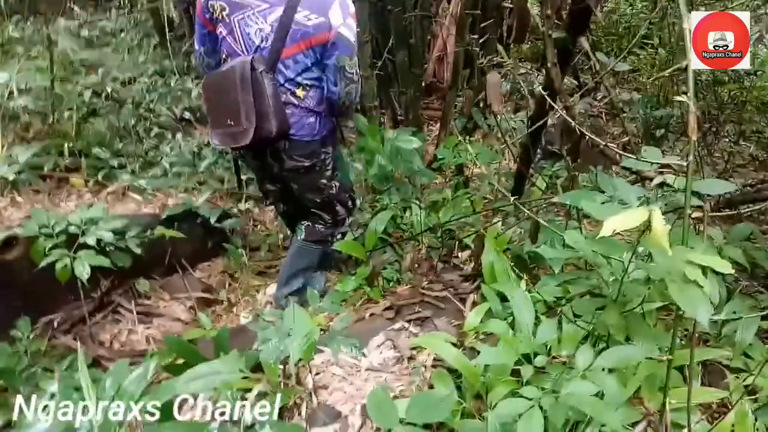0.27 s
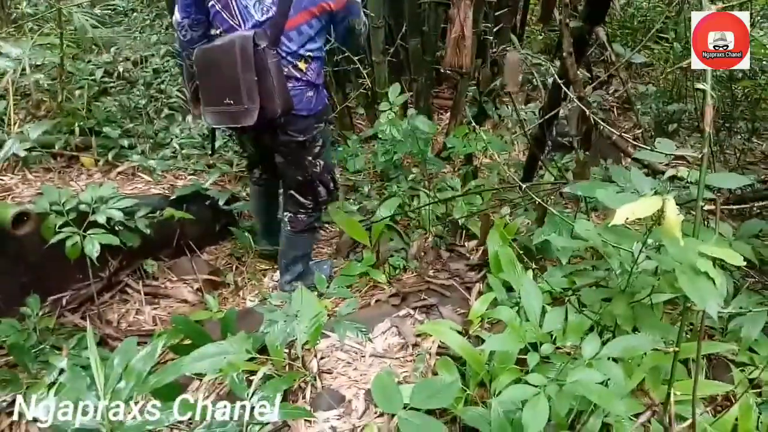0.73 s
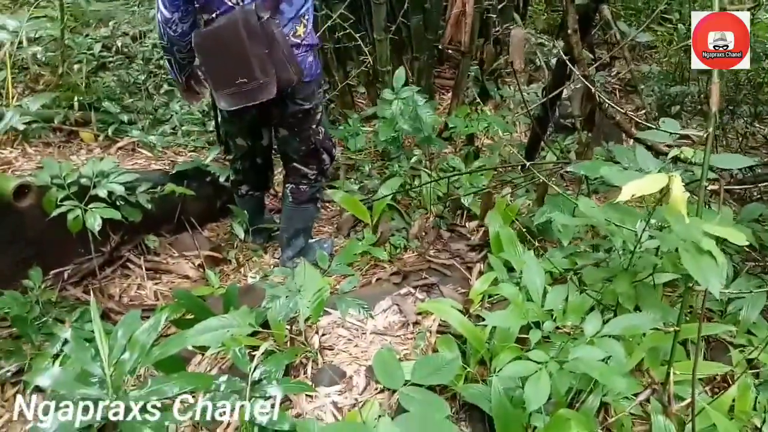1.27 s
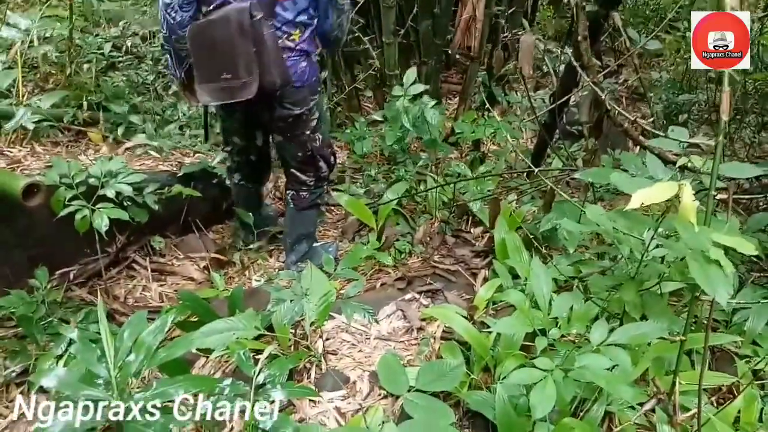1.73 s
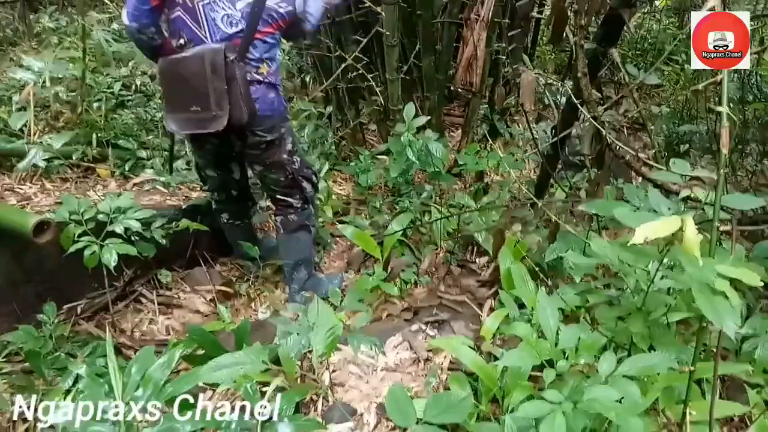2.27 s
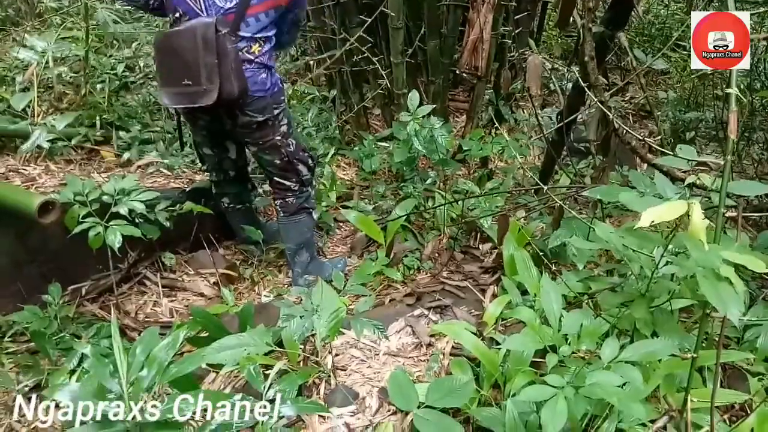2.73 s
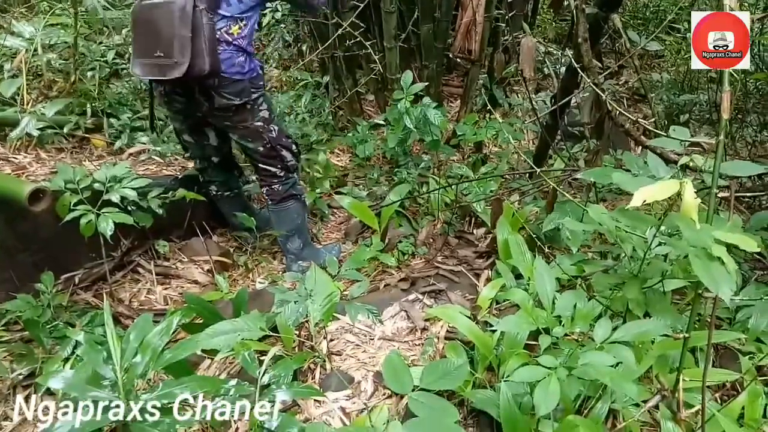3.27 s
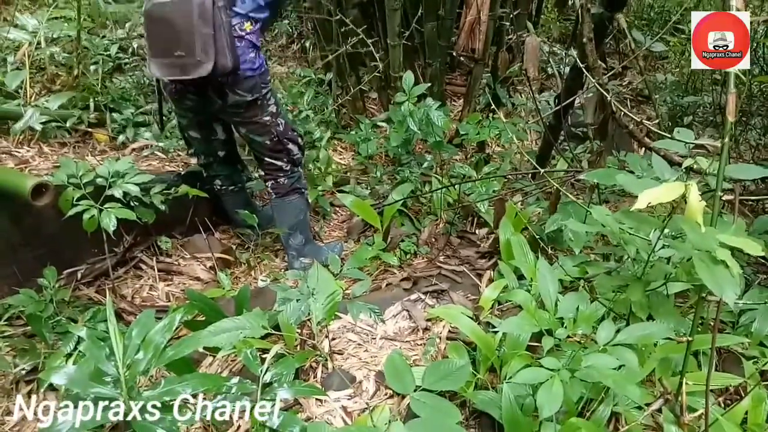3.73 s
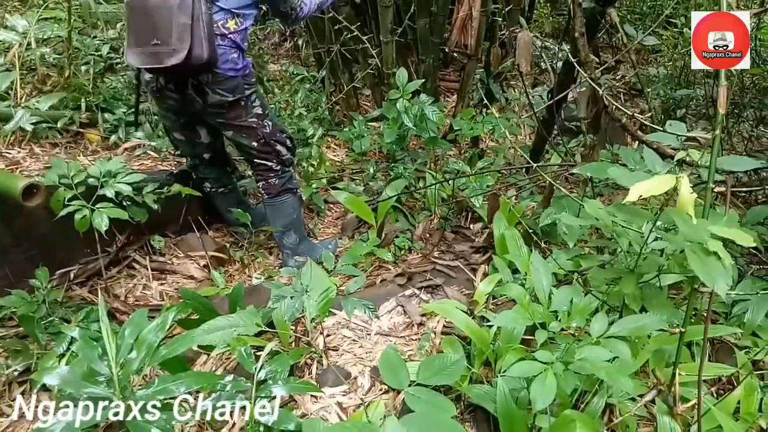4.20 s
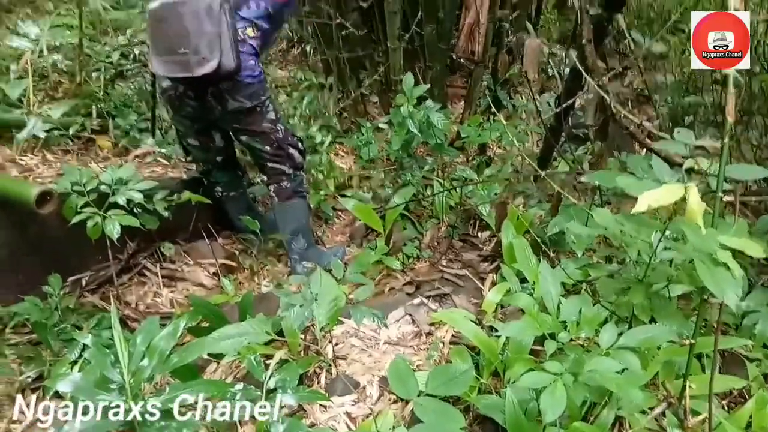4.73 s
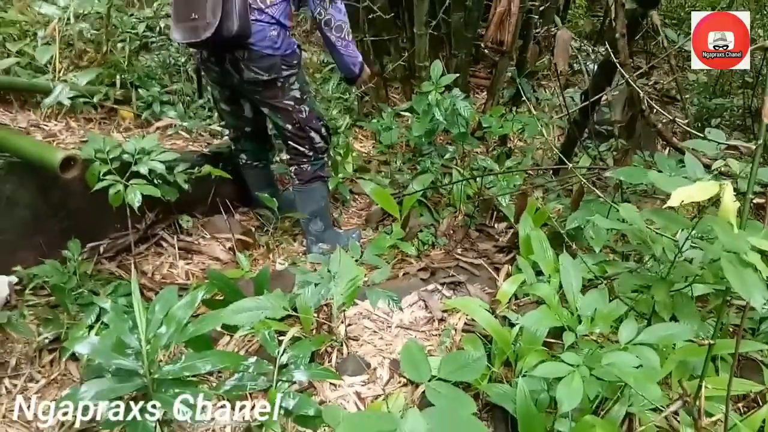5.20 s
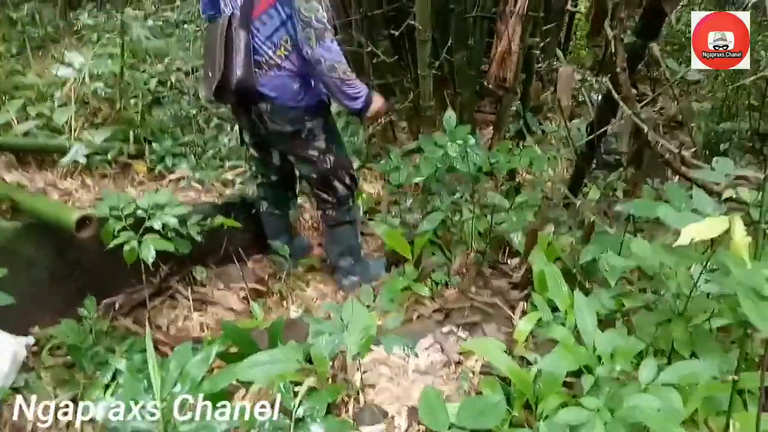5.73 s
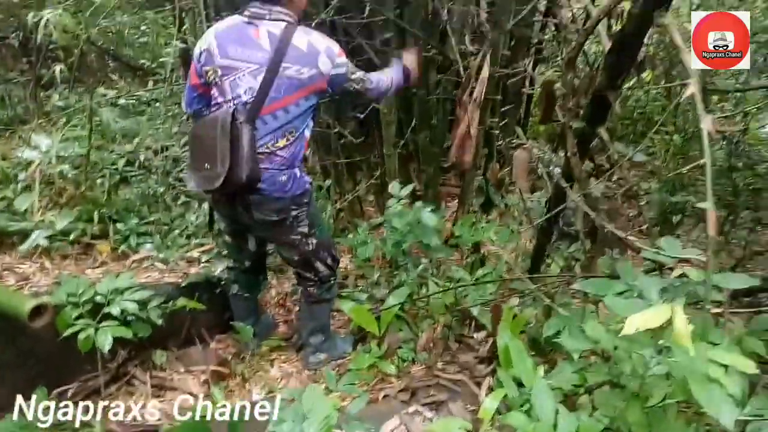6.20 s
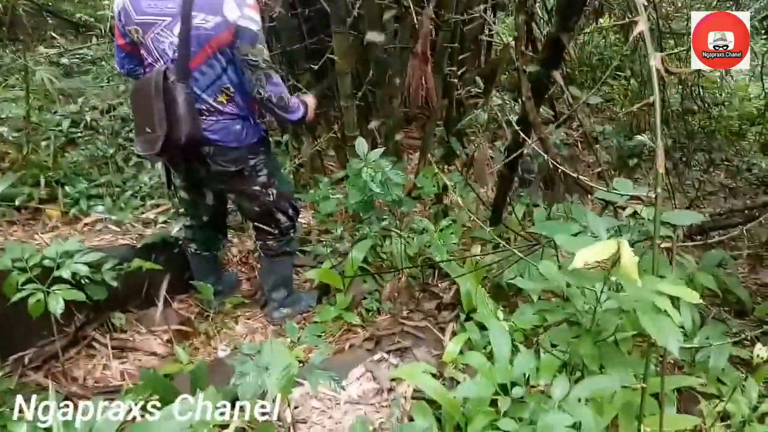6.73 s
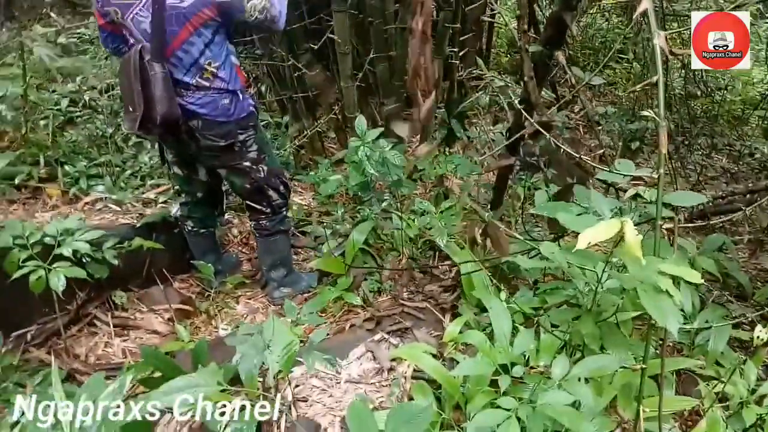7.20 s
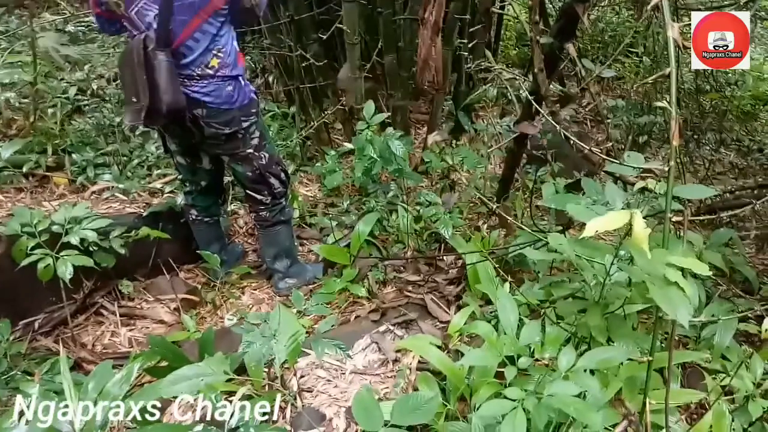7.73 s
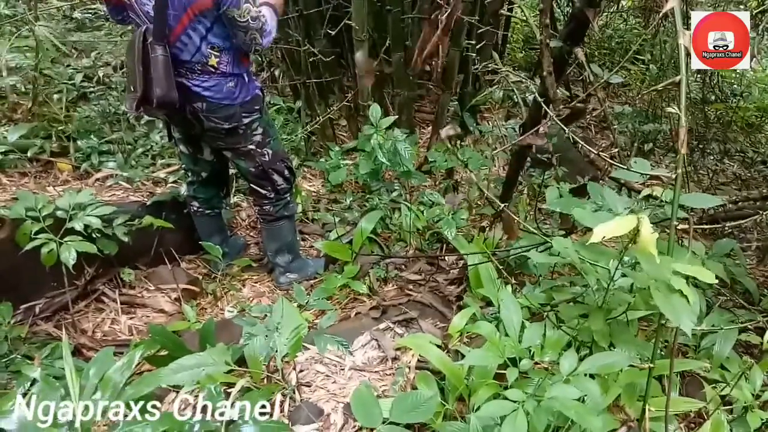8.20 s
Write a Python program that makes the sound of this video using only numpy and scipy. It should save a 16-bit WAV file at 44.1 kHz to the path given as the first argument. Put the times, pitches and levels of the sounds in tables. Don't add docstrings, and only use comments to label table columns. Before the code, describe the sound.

A quiet forest opens with thin steady crickets around 3.5 kHz, a far insect chorus and soft low rumble; a faint thump comes near 0.1 s, a tiny rising two-note bird whistle at 0.8 s and a small twig tick at 0.9 s. At 1.3 s a blade hits dry cane: a sharp crack, tearing fibres, hollow knocks and rustling leaves until about 1.8 s. Further blows land at 2.4, 3.5 and 4.4 s, the third strong and splintery, with twigs snapping between. From 4.7 to 6 s only light rustle and small ticks remain. At 6.2 s a dense rapid burst of cracks lasts about 0.15 s, then leaves shake and twigs tick. A last heavy, woody crack at 7.6-7.7 s has a brief stem creak and strong rustling, fading into small snaps by 8.4 s. Short diffuse tree echoes follow the blows; close-to-middle distance, wide stereo.

```python
import sys
import numpy as np
from scipy import signal
from scipy.fft import rfft, irfft, next_fast_len
from scipy.io import wavfile
from scipy.ndimage import uniform_filter1d

SR = 44100
rng = np.random.default_rng(int(sys.argv[2]) if len(sys.argv) > 2 else 0)


def ratio_of_db(decibels):
    return 10 ** (np.asarray(decibels, float) / 20)


def file_out(sig):
    cols = np.atleast_2d(sig).T
    lim = np.clip(cols, -1, 1)
    pcm = np.round(lim * 32767).astype(np.int16)
    wavfile.write(sys.argv[1], SR, pcm)


N = 373086
SIZE = next_fast_len(N + 4096, True)
HZ = np.maximum(np.arange(SIZE // 2 + 1) * SR / SIZE, 1.)
T = np.arange(N) / SR

# pitch_hz, level_db (per Hz)
FOREST_COLOUR = [(18, -42), (40, -17.5), (62, -2.5), (110, 1.5), (364, -20), (1700, -24), (3050, -29.5),
                 (3250, -10.5), (3750, -7), (4700, -20), (6900, -25), (7470, -55.5), (12300, -43),
                 (14400, -31), (15100, -50)]
# pitch_hz, likeness_0_to_1
FAR_LIKENESS = [(60, 0.8), (130, 0.8), (300, 0.9), (700, 0), (1500, 0.5), (3000, 0)]
# pitch_hz, width_hz, level_db
CRICKETS = [(3260, 35, -4), (3330, 25, -5.5), (3484, 25, -3.5), (3525, 35, -3), (3630, 22, -7.5)]
# time_s, level_db
CRICKET_SWELL = [(0.0, -51.5), (0.38, -55.5), (1.34, -56), (1.43, -55), (2.09, -56.5), (3.72, -54),
                 (4.29, -57.5), (4.59, -53.5), (6.03, -56.5), (6.41, -52), (6.76, -54.5), (8.46, -52.5)]
# pitch_hz, width_hz, level_db
KATYDIDS = [(13000, 86, -7), (13300, 150, -4.5), (13900, 75, 2.5), (14500, 41, -3.5)]
# start_s, peak_db, pitch_hz, fade_60db_s
THUMPS = [(0.135, -50, 125, 0.15), (1.44, -38, 163, 0.14), (1.518, -51, 238, 0.36),
          (1.636, -45, 64.6, 0.18), (1.661, -45.5, 107.5, 0.1), (2.437, -39, 184, 0.26),
          (3.49, -38.5, 135, 0.55), (3.6, -45, 200, 0.4), (3.677, -43, 121.5, 0.29), (4.799, -59, 98, 0.19),
          (6.216, -37.5, 204, 0.14), (7.631, -49, 216, 0.2), (7.799, -43, 169.4, 0.24),
          (8.328, -58, 245, 0.2)]
# strongest_s, leaves_db, rise_60db_s, fade_60db_s, blades_over_leaves_db
SHAKES = [(.45, -76, 2.5, 1.5, 5), (.9, -81, 1.5, 1.1, 17), (1.44, -53, .25, 1.2, .3),
          (1.79, -62, 2.5, .7, -4), (2.12, -78, .6, .6, 9), (2.58, -56, .3, .9, -4), (3.2, -74, .8, .6, 5),
          (3.62, -62, .35, 1.1, -5), (3.85, -61, 2.5, .55, -6), (4.63, -62, .55, 1.2, 2.5),
          (4.82, -64, .9, 1.1, 1.5), (5.06, -66, 1.8, .35, .3), (5.51, -68, .12, 1.5, 0),
          (5.56, -69, .4, 1.3, 3), (5.72, -66, 1.1, .4, .3), (6.38, -40, .2, .4, -12),
          (6.52, -62, .3, .7, 7), (6.84, -62, 1.5, 2.2, -7), (7.08, -64, 1.2, 2.5, -2),
          (7.2, -59, .6, 2.2, -9), (7.5, -63, 1.5, 1.5, -7), (7.78, -43, .55, .65, 2.5),
          (8.1, -62, 1.5, 1.5, -6), (8.32, -62, .6, 1.5, 3), (8.46, -58, .8, 1.1, -5)]
# pitch_hz, level_db
LEAF_COLOUR = [(800, -28), (1400, -6.5), (2000, -4), (3000, 0), (4500, -8), (7000, -28.5)]
BLADE_COLOUR = [(2200, -22.5), (3300, -5), (4600, 3), (5800, -12), (7500, -21), (10000, -28),
                (15000, -25.5)]
STALK_COLOUR = [(150, -20), (300, -7), (550, 1.5), (900, -1.5), (1600, -36.5)]
# pitch_hz, likeness_0_to_1
NEAR_LIKENESS = [(60, .95), (300, 0.96), (700, 0.86), (1500, 0.5), (3000, 0.1), (12000, .15)]
# start_s, peak_db, left_minus_right_db, pitch_hz
SNAPS = [(3.476, -13, -7, 3060), (4.447, -14, 5, 2840), (5.305, -31, -1, 3200), (5.663, -33, 0, 3400),
         (5.755, -38.5, -13, 3370), (6.236, -9, 8, 4270), (6.456, -27, 19, 3630), (7.152, -17, 8, 1490),
         (7.214, -36, 2, 2420), (7.396, -36, 1.5, 4070), (7.257, -31, 3, 2580), (7.314, -29.5, -10, 3860),
         (7.422, -28, -1.5, 3720), (7.542, -32, -3.0, 4020), (7.705, -8, 14, 3450),
         (8.131, -32, -2.5, 4330), (.54, -56, 0, 4500), (2.412, -14, 0, 3900), (4.446, -8, 0, 6800),
         (4.463, -12, 0, 3000), (3.478, -9, 0, 5000), (4.826, -44, -1.5, 4180), (4.899, -45, 0, 3910),
         (4.951, -43, 1.5, 3000), (5.074, -47, 0, 3290), (5.505, -47, 1.5, 3370), (5.691, -46, 3, 3530),
         (5.725, -46, 3, 3520), (6.2075, -9, 0, 4240), (2.5505, -24, 3, 1750), (3.7255, -32, 0, 3500),
         (1.289, -10, 0, 4000), (6.655, -36, 0, 4500), (6.797, -34, 0, 3700), (6.259, -13, 0, 6000),
         (6.338, -6, 0, 3800), (7.6215, -10, 0, 5000), (7.644, -12, 0, 5000)]
# pitch_hz, level_db
CLICK_COLOUR = [(200, -35), (600, -10), (2500, 0), (4800, 0), (7500, -8), (12000, -15), (16000, -22)]
# pitch_hz, fade_60db_s
TRUNK_FADE = [(150, .35), (600, 0.62), (2000, 0.51), (5000, 0.33), (10000, 0.31)]
# pitch_hz, likeness_0_to_1
ECHO_LIKENESS = [(100, 1), (600, 0.8), (1500, 0.8), (3000, 0)]
# start_s, length_s, level_db, pitch_hz
BIRD = [
    (.75, .06, -67, 4230),
    (.82, .08, -67, 4720),
]
# start_s, peak_db, ring_hz, fade_60db_s, ring_over_crack_db
TWIGS = [(.884, -50, 3900, .08, 8), (2.881, -37, 2000, .07, -3), (2.897, -32.5, 2050, .066, 2.5),
         (3.159, -46, 3700, .15, 7.5), (3.212, -36, 3760, .12, 2.2), (4.784, -40, 3220, .052, 16),
         (4.804, -42, 5170, .076, 12.5), (4.919, -46, 3770, .05, 9), (5.305, -43, 2390, .026, 7),
         (5.546, -43.5, 2740, .069, 8), (5.661, -39, 3400, .053, 8), (6.654, -39, 3330, .027, 14),
         (6.795, -35, 3690, .05, 12), (6.932, -37, 3440, .035, -16), (7.091, -42.5, 2720, .15, 6),
         (7.226, -37, 2790, .033, -1.5), (7.253, -32, 2610, .05, -11), (7.3, -40, 1710, .028, -4),
         (7.421, -34, 4100, .042, -6), (7.438, -37, 3950, .073, -1.5), (7.54, -33, 3860, .033, 7),
         (8.133, -39.5, 4370, .045, 18), (8.262, -28, 4440, .13, 5.5), (8.391, -35, 2740, .06, -1.5)]
# start_s, peak_db, ring_hz, fade_60db_s, ring_over_crack_db
CRACKS = [(1.28, -20.5, 4200, .15, 6), (1.29, -8.5, 3330, .069, -8), (1.322, -20, 3470, .064, -5),
          (1.371, -17, 2980, .042, -10), (1.382, -20, 1150, .08, 8.5), (1.455, -19, 2050, .11, -6),
          (1.54, -19, 1600, .09, -3), (2.412, -9.5, 3100, .031, -6), (2.42, -15.5, 3890, .13, 1.2),
          (2.57, -19, 4830, .093, 1.2), (2.604, -19, 2120, .033, 4.5), (3.477, -5.5, 2950, .043, 0),
          (3.519, -14, 2000, .03, 2), (3.523, -7, 2970, .044, -4), (3.572, -9.5, 3020, .036, -14),
          (4.4455, -11.5, 4400, .045, -2), (4.461, -16, 3500, .04, 2), (4.478, -17, 3900, .13, -3),
          (6.195, -38, 1600, .05, 0), (6.2065, -9, 4200, .035, 0), (6.211, -20, 1200, .1, 3),
          (6.2358, -10.5, 3870, .022, 0), (6.246, -17.5, 3400, .05, -2), (6.258, -14, 2600, .03, -8),
          (6.25, -23, 800, .15, 2), (6.277, -17, 3800, .06, 2), (6.286, -19, 1360, .06, 3),
          (6.311, -24, 1300, .03, 3), (6.321, -11, 3660, .035, 0), (6.3255, -8, 3800, .028, 4),
          (6.335, -7, 3900, .028, 0), (6.338, -23, 800, .14, 3), (7.621, -9.5, 2460, .043, -1.5),
          (7.643, -13, 1910, .078, 6.5), (7.706, -6.5, 3470, .055, -2)]
# start_s, peak_db, ring_hz, fade_60db_s
TEARS = [(1.409, -26, 4020, .083), (1.591, -33, 1980, .05), (1.638, -31.5, 2060, .045),
         (1.729, -43, 1030, .2), (2.521, -26.5, 1500, .07), (2.55, -25, 810, .06),
         (2.754, -35.5, 4330, .046), (3.724, -30.5, 3140, .02), (4.529, -30, 2930, .12),
         (4.629, -32, 2400, .026), (6.367, -19.5, 3100, .1), (6.456, -30, 3630, .039),
         (6.494, -29, 4800, .031), (6.537, -34.5, 3250, .04), (6.586, -37.5, 3340, .048),
         (7.153, -30, 720, .035), (7.612, -20, 4000, .04), (7.649, -11, 3300, .1), (7.745, -24, 4300, .07),
         (7.783, -22, 4130, .04), (7.826, -29, 1400, .08), (7.874, -25.5, 4220, .088),
         (7.991, -32.5, 970, .082)]
BLOWS = [1.28, 2.41, 3.47, 4.44, 6.2, 7.61]
# pitch_hz, level_db
FIBRE_COLOUR = [(180, -40.5), (300, -26.5), (494, -2.5), (574, -12.5), (725, -4), (2740, 1.5), (3080, 5),
                (4830, 1), (8220, -22.5), (13800, -33), (16000, -48.5)]
THUD_COLOUR = [(40, -45), (80, -13.5), (140, -3.5), (250, -6.5), (500, -4), (800, -4.5), (1500, -20.5)]
# start_s, peak_db, pitch_hz, fade_60db_s
KNOCKS = [(1.5444, -33, 1004, 0.045), (1.6377, -38, 1456, 0.041), (2.8953, -29, 1420, 0.05),
          (3.7399, -44.5, 1500, 0.057), (3.9155, -56, 1233, 0.093), (5.3023, -47, 1440, 0.059),
          (6.2931, -26, 1400, 0.04), (6.6223, -57, 1003, 0.15), (8.2796, -40, 1006, 0.033),
          (1.289, -28, 452, 0.11), (3.217, -59, 906, 0.15), (3.599, -31, 818, 0.056),
          (3.788, -44.5, 607, 0.061), (3.829, -55, 540, 0.11), (3.902, -56, 598, 0.15),
          (7.645, -14.5, 504, 0.062), (4.447, -19, 900, .05), (4.533, -30, 3000, .04),
          (4.554, -33, 2600, .03), (4.612, -38, 2600, .025), (4.629, -36, 2500, .03),
          (2.521, -33, 1000, .04), (2.586, -31, 3400, .03), (4.742, -46, 1850, .04),
          (3.479, -21, 3020, .04), (3.524, -25, 2000, .04), (3.578, -27, 1380, .04),
          (3.581, -28, 3080, .035), (3.725, -37, 3140, .03), (2.604, -27, 2120, .04),
          (2.913, -38, 2100, .04), (2.601, -28, 2880, .04), (2.683, -42, 2950, .04),
          (2.666, -44, 2130, .05), (7.832, -40, 495, 0.06), (8.009, -48.5, 728, 0.14),
          (1.6377, -48, 1990, 0.05), (2.8823, -32, 2160, 0.045), (2.8953, -32, 2205, 0.04),
          (3.6371, -42, 2070, 0.03), (3.8212, -41, 2640, 0.04), (5.3038, -35.5, 2300, 0.028),
          (6.7974, -37.5, 2320, 0.044), (5.303, -62, 347, 0.03), (7.151, -37, 330, 0.03)]
# start_s, length_s, level_db, pitch_hz
RUBS = [(1.64, .24, -66, 1000), (1.78, .07, -65, 2100), (2.71, .07, -63, 980), (3.69, .28, -66, 600),
        (4.7, .26, -72, 1450), (4.78, .04, -62, 2000), (5.54, .13, -72, 1900), (7.715, .03, -33, 740),
        (7.748, .034, -34, 760), (8.27, .1, -56, 950)]
# pitch_hz, left_minus_right_db
PORT_COLOUR = [(60, 5.0), (110, 4), (200, 6.5), (380, 6.5), (700, 6), (1290, 5), (2380, 6), (4400, -5.5),
               (8120, 5.5), (15000, 5.5)]


def along(table, hz=HZ):
    pitch, value = np.array(table).T
    return np.interp(np.log(hz), np.log(pitch), value)


def colour(x, table):
    hz = np.maximum(np.arange(1025) * SR / 2048, 1.)
    cepstrum = irfft(np.log(ratio_of_db(along(table, hz))))
    cepstrum[1:1024] *= 2
    cepstrum[1025:] = 0
    taps = irfft(np.exp(rfft(cepstrum)))[:768]
    taps = taps / np.sqrt(np.sum(taps ** 2))
    return signal.oaconvolve(x, taps[None], axes=1)[:, :N]


def walk(rate):
    hold = max(int(SR / rate), N // 4000 + 1)
    steps = np.repeat(rng.standard_normal(4000), hold)[:N]
    return 1.3 * uniform_filter1d(uniform_filter1d(steps, hold), hold)


def grains(spread_db, patchy_db, rate):
    rare_large = np.minimum(rng.exponential(size=N), 6)
    x = ratio_of_db(spread_db * rare_large + patchy_db * walk(rate)) * rng.standard_normal((2, N))
    return x / np.sqrt(np.mean(x ** 2))


def ports(x, likeness):
    same = np.clip(along(likeness), 0, 1)
    mid, side = rfft(x, SIZE) * np.sqrt([(1 + same) / 2, (1 - same) / 2])
    return irfft([mid + side, mid - side], SIZE)[:, :N]


def patchy(x, spread_db, size, hz_wide, s_long):
    z = signal.stft(x, nperseg=size)[2]
    spots = rng.standard_normal(z.shape[1:])
    for axis, bins in enumerate((hz_wide * size / SR, s_long * 2 * SR / size)):
        for _ in range(2):
            spots = uniform_filter1d(spots, max(int(bins), 1), axis=axis)
    gain = ratio_of_db(spread_db * np.minimum(spots / spots.std(), 1))
    gain = gain / np.sqrt(np.mean(gain ** 2))
    return signal.istft(z * gain, nperseg=size)[1][:, :N]


def forest():
    air = rfft(rng.standard_normal((2, N)), SIZE) * ratio_of_db(along(FOREST_COLOUR))
    air = patchy(irfft(air, SIZE)[:, :N], 2.5, size=2048, hz_wide=150., s_long=.1)
    return ports(air * ratio_of_db(-64.5) / air.std(), FAR_LIKENESS)


def singers(table):
    out = 0
    for hz, width_hz, db in table:
        peak = signal.iirpeak(hz, hz / width_hz, fs=SR)
        band = signal.lfilter(*peak, signal.lfilter(*peak, rng.standard_normal((2, N))))
        swell_db = 1.6 * walk(2.5) + .8 * walk(14.)
        out = out + ratio_of_db(db + swell_db) * band / band.std()
    return out


def crickets():
    swell_db = np.interp(T, *np.transpose(CRICKET_SWELL))
    return singers(CRICKETS) * ratio_of_db(swell_db - 6.5) + ratio_of_db(-92.5) * singers(KATYDIDS)


def struck(table, push_s):
    out, t = np.zeros(N + SR), np.arange(SR // 2) / SR
    for s, db, hz, t60 in table:
        level = ratio_of_db(db - 60 * t / t60) * (1 - np.exp(-t / push_s))
        out[int(s * SR):][:len(t)] += level * np.sin(2 * np.pi * hz * t)
    return ratio_of_db(-0.5) * out[:N]


def thumps():
    return struck(THUMPS, 0.0053)


def shaking():
    t = T[::64]
    s, db, rise, t60, blade_db = np.array(SHAKES).T[:, :, None]
    each_db = db - 60 * np.maximum((s - t) / rise, (t - s) / t60)
    leaf = ratio_of_db(2 * each_db).sum(0)
    blade = ratio_of_db(2 * (each_db + blade_db)).sum(0)
    stalk = ratio_of_db(2 * -55) * (leaf / ratio_of_db(-100)) ** 1.6
    parts = (leaf, -85), (stalk, -83), (blade, -78)
    return [np.interp(T, t, 10 * np.log10(power + ratio_of_db(2 * still_db))) for power, still_db in parts]


def rustle():
    leaf_db, stalk_db, blade_db = shaking()
    leaves = ratio_of_db(leaf_db + 4.5) * colour(grains(4.8, 2.6, rate=46.0), LEAF_COLOUR)
    blades = ratio_of_db(blade_db + 7.0) * colour(grains(3.0, 3.0, rate=90.0), BLADE_COLOUR)
    stalks = ratio_of_db(stalk_db - 2.0) * colour(grains(1.2, 4.0, rate=9.2), STALK_COLOUR)
    bush = patchy(leaves + blades + stalks, 3.9, size=512, hz_wide=180., s_long=.02)
    return ports(bush, NEAR_LIKENESS)


def snaps():
    x, t = np.zeros((2, N)), np.arange(128) / SR
    for s, db, pan_db, hz in SNAPS:
        swing = np.cos(2 * np.pi * hz * t) * np.exp(-1.3 * hz * t)
        sides = ratio_of_db(db + np.array([pan_db, -pan_db]) / 2)
        x[:, int(s * SR):][:, :len(t)] += np.outer(sides, swing)
    return ratio_of_db(-5.0) * colour(x, CLICK_COLOUR)


def trunks(x):
    t, echo = np.arange(SR // 2) / SR, 0
    for hz, t60 in TRUNK_FADE:
        band_filter = signal.butter(2, [hz / 2.58, hz * 1.82], "band", fs=SR, output="sos")
        band = signal.sosfilt(band_filter, rng.standard_normal((2, len(t))))
        echo = echo + band * ratio_of_db(-60 * t / t60) * np.clip(t / 0.019, 0, 1)
    echo = signal.oaconvolve(x, echo / np.sqrt(np.sum(echo ** 2)), axes=1)[:, :N]
    echo = patchy(echo, 3.5, size=512, hz_wide=250., s_long=.02)
    return ratio_of_db(-8) * ports(echo, ECHO_LIKENESS)


def bird():
    x, rise_hz_per_s = np.zeros(N), 900
    for s, length, db, hz in BIRD:
        t = np.arange(int(length * SR)) / SR
        whistle = np.sin(2 * np.pi * (hz + rise_hz_per_s * t / 2) * t)
        x[int(s * SR):][:len(t)] += ratio_of_db(db + 3) * whistle * signal.windows.tukey(len(t), .6)
    return x


def thud_level(t60):
    return min(-19 + 14 * np.log2(max(t60, .004) / .05), -9)


def cut_loss(s):
    return 35 * min(abs(s - blow) for blow in BLOWS)


def breaks():
    found = []
    for s, db, hz, t60, ring_db in CRACKS:
        found.append((s, db, hz, thud_level(t60) - cut_loss(s), t60, ring_db, 17500))
    for s, db, hz, t60 in TEARS:
        found.append((s, db, hz, thud_level(t60) - cut_loss(s), t60, 3, 3.0 * hz))
    for s, db, hz, t60, ring_db in TWIGS:
        found.append((s, db, hz, thud_level(t60) - 17, t60, ring_db, 5.0 * hz))
    return found


def cracks():
    fibres, t_all = grains(2.0, 2.5, rate=350.), np.arange(int(.3 * SR)) / SR
    snap, ring, thud = np.zeros((3, 2, N))
    for s, db, hz, thud_db, t60, ring_db, top_hz in breaks():
        i = int(s * SR)
        t = t_all[:N - i]
        span = slice(i, i + len(t))
        fade = ratio_of_db(db - 60 * (t / max(t60, .004)) ** 1.396) * (1 - np.exp(-t / 0.00021))
        tear = fibres[:, span] * fade
        dull = signal.butter(2, min(top_hz, .4 * SR), fs=SR)
        snap[:, span] += signal.lfilter(*dull, tear)
        cane = signal.iirpeak(hz, hz / 173.0, fs=SR)
        ring[:, span] += ratio_of_db(ring_db) * signal.lfilter(*cane, tear)
        answer = ratio_of_db(db + thud_db - 60 * t / (t60 + 0.11)) * (1 - np.exp(-t / 0.0096))
        thud[:, span] += fibres[::-1, span] * answer
    torn = patchy(colour(snap, FIBRE_COLOUR), 2.3, size=256, hz_wide=500., s_long=.008)
    near = ratio_of_db(-10) * torn + ratio_of_db(2.5) * ring + ratio_of_db(-6.5) * colour(thud, THUD_COLOUR)
    return ports(near, NEAR_LIKENESS)


def hollow_canes():
    return struck(KNOCKS, .003)


def rubs():
    x, drag, width_hz = np.zeros(N), grains(2.5, 3.0, rate=60.)[0], 110
    for s, length, db, hz in RUBS:
        i, n = int(s * SR), int(length * SR)
        peak = signal.iirpeak(hz, hz / width_hz, fs=SR)
        hum = signal.lfilter(*peak, signal.lfilter(*peak, drag[i:i + n]))
        x[i:i + n] += ratio_of_db(db) * hum / hum.std() * signal.windows.tukey(n, .6)
    return x


def scene():
    background = forest() + crickets() + bird()
    blows = cracks()
    canes = snaps() + hollow_canes()
    echoes = trunks(blows + .3 * canes)
    return background + thumps() + rustle() + blows + canes + echoes + rubs()


def top_cut(x):
    return signal.sosfilt(signal.butter(12, 16560, fs=SR, output="sos"), x)


def record(dry):
    left_db = along(PORT_COLOUR) / 2
    lag = np.exp(-2j * np.pi * HZ * np.array([[2], [0]]) / SR)
    heard = irfft(rfft(dry, SIZE) * ratio_of_db(np.array([left_db, -left_db])) * lag, SIZE)
    spectrum = rfft(np.tanh(2 * heard) / 2)
    thin_hz = 7300
    body = irfft(spectrum * (HZ <= thin_hz), SIZE)[:, :N]
    treble = irfft(spectrum * (HZ > thin_hz), SIZE)[:, :N]
    x = body + patchy(treble, 6, size=1024, hz_wide=200., s_long=.03)
    x = signal.sosfilt(signal.ellip(8, .2, 70, 15000, fs=SR, output="sos"), x)
    return top_cut(x)


dry = scene()
out = record(dry)
file_out(out)
```